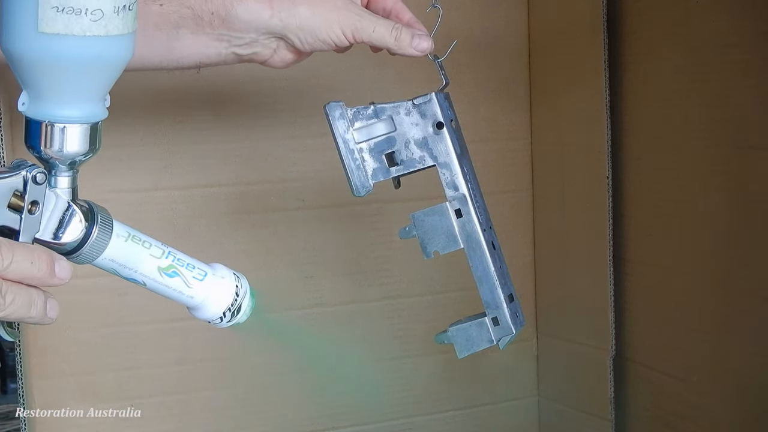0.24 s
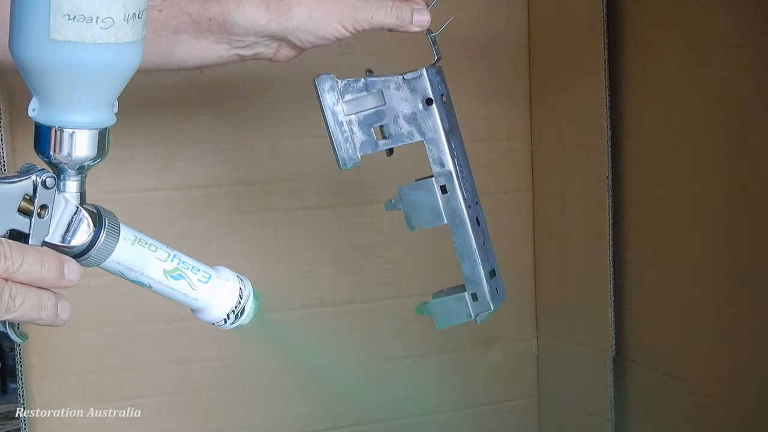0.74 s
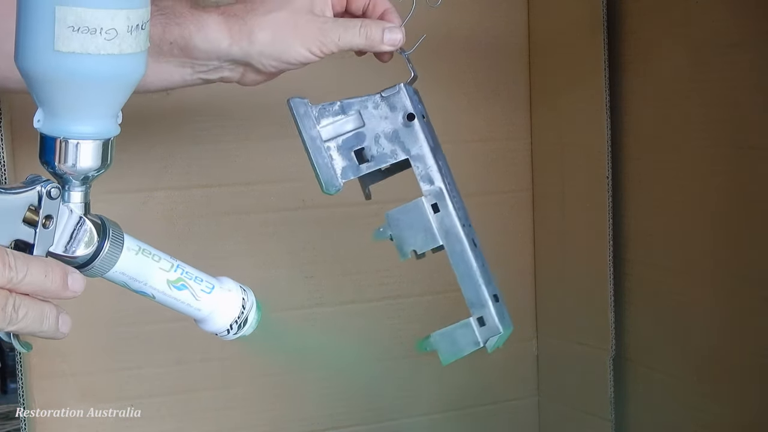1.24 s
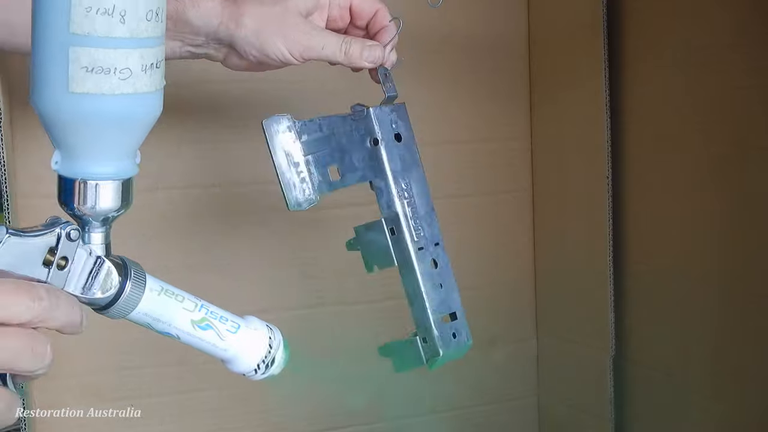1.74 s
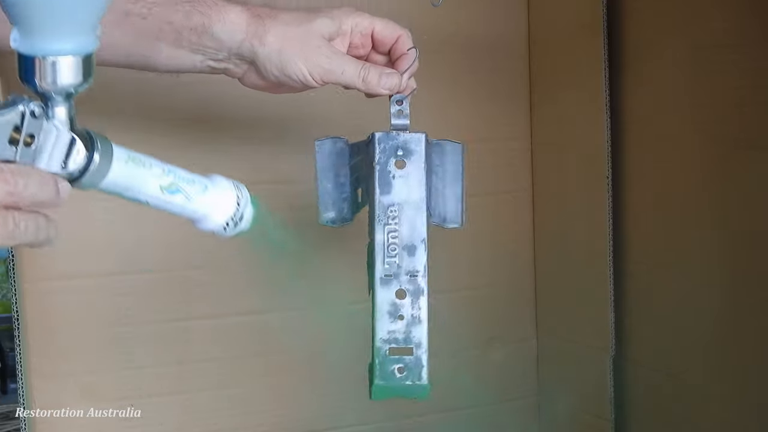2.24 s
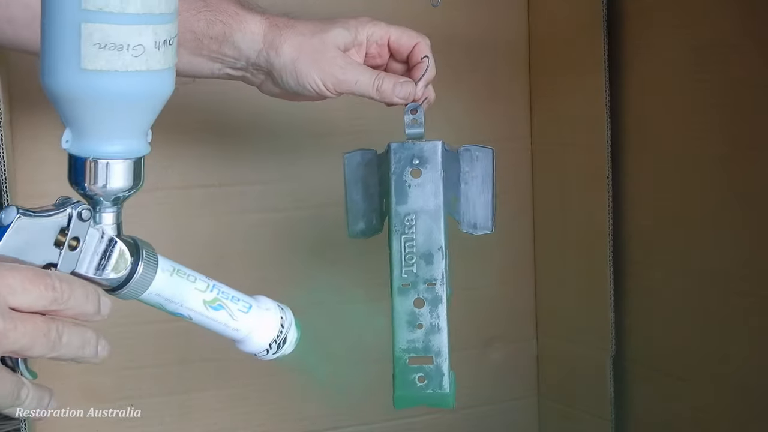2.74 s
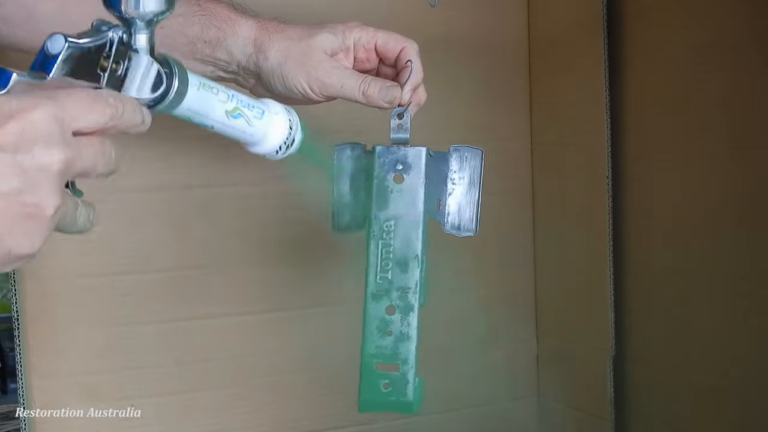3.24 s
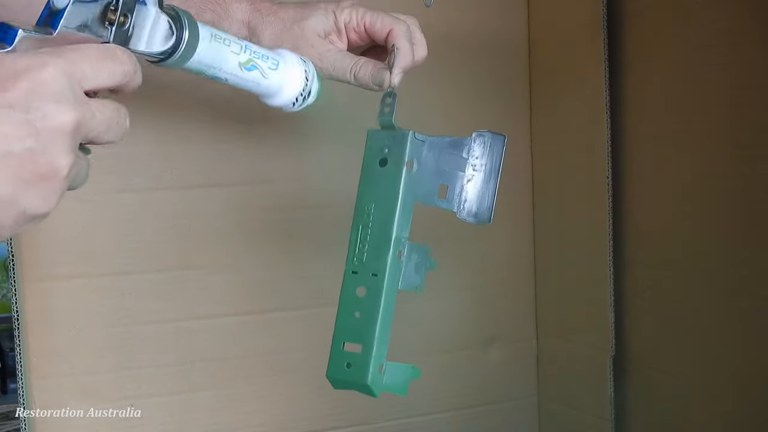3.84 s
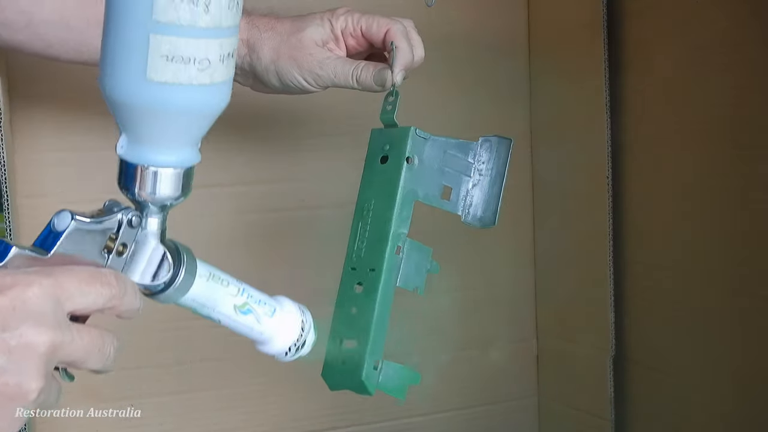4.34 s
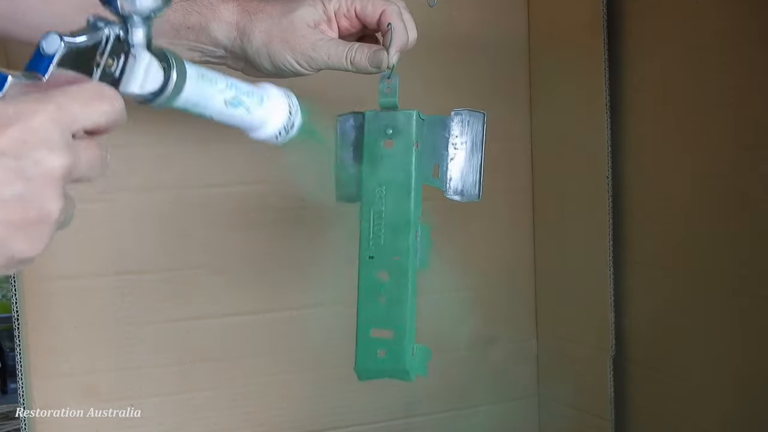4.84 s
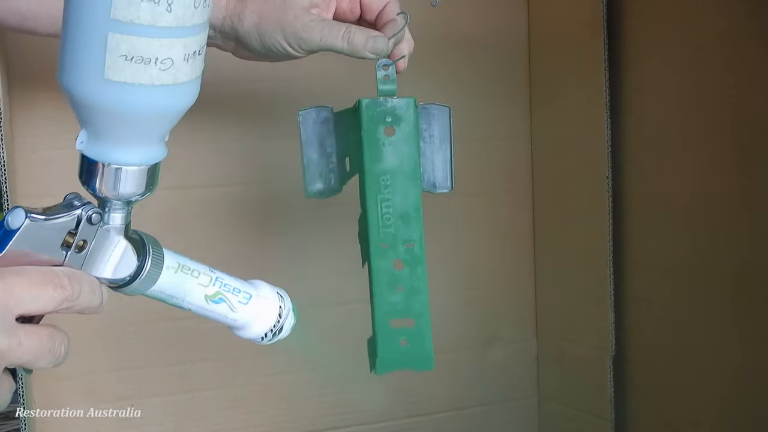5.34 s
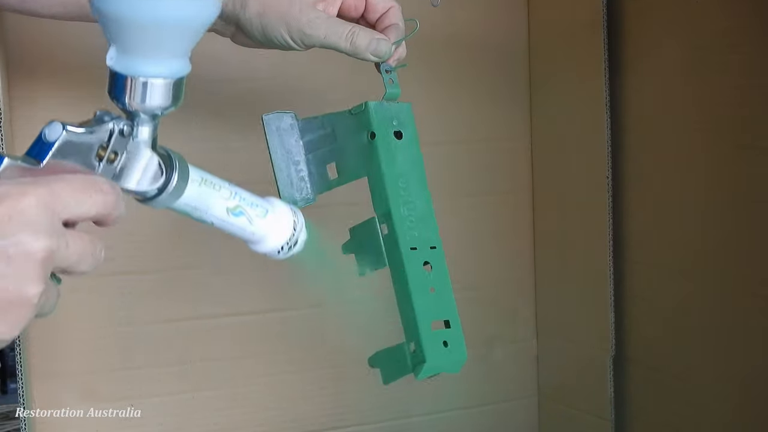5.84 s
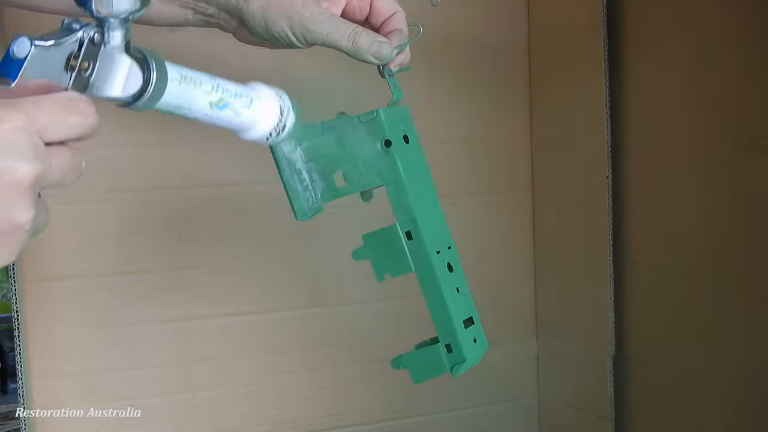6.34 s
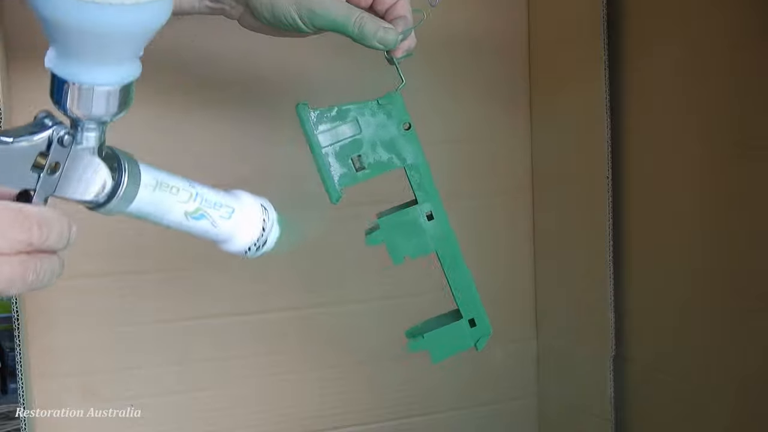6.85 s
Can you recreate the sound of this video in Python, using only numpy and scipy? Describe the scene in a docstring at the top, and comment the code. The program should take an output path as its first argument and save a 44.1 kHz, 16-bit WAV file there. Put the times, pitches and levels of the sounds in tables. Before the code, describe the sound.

A powder paint gun hisses close to the microphone for the whole seven seconds, a steady, slightly fluttering leak of air with a thin, high, breathy whistle that swells and fades. A soft metal knock comes at about 0.5 seconds. Then seven short trigger pulls each add a louder, broader rush that sputters and spits powder, at about 2.0, 2.6, 3.2, 4.0, 4.8, 6.0 and 6.5 seconds. Each lasts around a fifth of a second, the one at 4.8 a little longer. Light metal clicks come near 2.5 and 6.4 seconds, with fainter ticks near 2.8 and 3.5. Just before 4 seconds a faint band of hiss rises in pitch. After the last spurt, the steady hiss and whistle continue to the end. Nearby cardboard walls give the hiss a slightly hollow, shifting colour, and a quiet, low workshop rumble lies underneath.

```python
"""A powder-paint gun in a workshop, aimed into a cardboard booth, close to a small camera's two ports.
Air bleeds steadily through its long hollow nozzle tube with a breathy whistle; seven trigger pulls
each add a broader, sputtering rush and spit slugs of powder. The booth walls, close by, comb the hiss.
The trigger and a hanging metal part click, and the workshop rumbles in the background."""
import sys
import numpy as np
from scipy import signal
from scipy.fft import rfft, irfft, next_fast_len
from scipy.io import wavfile
from scipy.ndimage import uniform_filter1d, minimum_filter1d

SR = 44100
rng = np.random.default_rng(int(sys.argv[2]) if len(sys.argv) > 2 else 0)


def log_audio(samples):
    """Write samples as a 16-bit WAV file to the path given in sys.argv[1]."""
    # one column per channel
    frames = np.atleast_2d(samples).T
    # limit to full scale, then quantise
    limited = np.clip(frames, -1, 1)
    pcm = np.round(limited * 32767).astype(np.int16)
    wavfile.write(sys.argv[1], SR, pcm)


N = 313551
TIME = np.arange(N) / SR
FFT_SIZE = next_fast_len(N + 8000)
BIN_HZ = np.maximum(np.arange(FFT_SIZE // 2 + 1) * SR / FFT_SIZE, 1)


def undb(db):
    """Decibels to gain."""
    return 10 ** (np.asarray(db) / 20)


def over_hz(table, column=1):
    """One column of a table whose rows begin with Hz, spread over the spectral bins."""
    rows = np.array(table, float)
    return np.interp(np.log(BIN_HZ), np.log(rows[:, 0]), rows[:, column])


def over_time(table):
    """The columns of a table whose rows begin with seconds, as one curve each."""
    seconds, *columns = np.transpose(table)
    return np.array([np.interp(TIME, seconds, column) for column in columns])


def wander(rate_hz):
    """Smooth random drift with a spread near 1."""
    hold = int(SR / rate_hz)
    steps = np.repeat(rng.standard_normal(N // hold + 1), hold)
    return 1.14 * uniform_filter1d(uniform_filter1d(steps, hold), hold)[:N]


def hiss(colour, edges_hz, levels_db, flicker_db, flicker_hz, grain_db):
    """Noise, a direct and a scattered row; each zone follows its level, its halves flickering apart."""
    grains = undb(grain_db * wander(600))
    spectrum = rfft(rng.standard_normal((2, N)) * grains, FFT_SIZE) * colour
    out = 0
    for low, high, db in zip(edges_hz, edges_hz[1:], levels_db):
        zone = 0
        middle = np.sqrt(low * high)
        for bottom, top in ((low, middle), (middle, high)):
            half = irfft(spectrum * ((BIN_HZ >= bottom) & (BIN_HZ < top)), FFT_SIZE)[:, :N]
            zone = zone + half * undb(flicker_db * wander(flicker_hz))
        out = out + zone / np.sqrt(np.mean(zone ** 2)) * undb(db)
    return out


def breath(centre_hz, width_hz):
    """Narrow noise of rms 1 around a moving centre, a direct and a scattered row."""
    lowpass = signal.butter(2, width_hz / 2, fs=SR, output="sos")
    sway = signal.sosfilt(lowpass, rng.standard_normal((2, 2, N)))
    phase = 2 * np.pi * np.cumsum(centre_hz) / SR
    band = sway[0] * np.cos(phase) + sway[1] * np.sin(phase)
    return band / band.std()


# Room tone of the workshop. Each row: frequency in Hz, relative level in dB.
ROOM_COLOUR = [(8.8, -54), (15, -16), (111, -1.5), (157, -5.5), (286, -9.5), (354, -9.5), (472, -11.5),
               (927, -13), (1120, -14.5), (1420, -14.5), (1500, -4.5), (1950, -37), (3300, -120)]
# Its slow swell. Each row: time in seconds, lift of the rumble in dB.
ROOM_SWELL = [(0, 0.5), (.45, 0.5), (.7, 4), (1, 0), (1.5, -0.5), (2.5, -2), (3.5, -1.5), (4.2, -2),
              (4.7, 1.5), (5.2, -2), (5.7, -1.5), (6.2, -2.5), (7.11, -1)]


def workshop():
    """The room behind the gun: a steady deep floor, a swelling rumble and a murmur above it."""
    swell_db, = over_time(ROOM_SWELL)
    levels_db = [-67, -57.5 + swell_db, -58 + .5 * swell_db]
    colour = undb(over_hz(ROOM_COLOUR))
    return hiss(colour, [16, 60, 200, 1500], levels_db, flicker_db=.5, flicker_hz=4, grain_db=0)


# Modes of the metal. Each row: frequency in Hz, relative level in dB, seconds to fall 60 dB.
METAL_MODES = [(250, -14, .06), (380, -12, .04), (600, -12, .03), (790, -8, .035), (910, -5, .035),
               (1250, -7, .012), (1900, -2, .009), (2600, 0, .012), (3200, -3, .008), (4700, -9, .01),
               (5400, -11, .01), (6200, -19, .01)]
# Knocks. Each row: start in seconds, peak in dB, lift of the low and of the high modes in dB.
KNOCKS = [(.5405, -31.5, 8, -6), (2.4897, -24.5, -16, 0), (2.4962, -22.5, -22, -4), (2.844, -39, -16, 2),
          (3.503, -38, -16, 6), (6.371, -25, -16, 2), (6.379, -28, -20, -2)]


def metal_clicks():
    """Trigger and hanging part: a soft contact rings damped modes; a weak copy comes off the booth."""
    out, t = np.zeros((2, N)), np.arange(4000) / SR
    contact = (1 - np.exp(-t / .0002)) ** 2
    detunes = 1 + .019 * rng.standard_normal((len(KNOCKS), len(METAL_MODES)))
    for (start, peak_db, low_db, high_db), detune in zip(KNOCKS, detunes):
        ring = 0
        for (hz, db, t60), ratio in zip(METAL_MODES, detune):
            gain = undb(db + low_db * (hz < 1000) + high_db * (hz > 4000))
            ring = ring + gain * np.sin(2 * np.pi * hz * ratio * t) * undb(-60 * t / t60) * contact
        i = int(start * SR)
        out[0, i:i + len(t)] += undb(peak_db) * ring / np.abs(ring).max()
    out[1] = .6 * np.roll(out[0], int(.00074 * SR))
    return signal.sosfilt(signal.butter(6, [130, 6000], "bandpass", fs=SR, output="sos"), out)


# Echoes off the cardboard. Each row: delay in ms, relative level in dB, drift in ms at a stray of 1.
WALL_ECHOES = [(1.091, -12.5, 0.098), (1.499, -10.5, 0.2), (2.498, -10, 0.18), (3.54, -11.5, 0.11),
               (4.298, -13, 0.13), (4.701, -16, 0.094), (5.099, -10.5, 0.23), (6.3, -11, 0.18)]
# How far the gun strays from its place. Each row: time in seconds, stray as a factor on the drift.
GUN_STRAY = [(0, 0.53), (1, 0.71), (2, 1.03), (3, 1.35), (7.11, 1.26)]


def booth(gun):
    """Short echoes off the nearby walls comb the hiss into bands that drift with the gun."""
    stray, = over_time(GUN_STRAY)
    out, samples = gun.copy(), np.arange(N)
    for delay_ms, db, drift_ms in WALL_ECHOES:
        delay = (delay_ms + drift_ms * stray * wander(4)) * SR / 1000
        out += undb(db) * np.array([np.interp(samples - delay, samples, row) for row in gun])
    return out / np.sqrt(1 + sum(undb(db) ** 2 for _, db, _ in WALL_ECHOES))


# One sweep of the gun. Each row: time in seconds, centre in Hz, level in dB.
SWING_PATH = [(3.78, 3220, -68), (3.85, 3270, -55), (3.92, 3550, -53), (4.0, 3870, -51), (4.07, 3950, -56),
              (4.12, 3980, -72)]


def gun_swing():
    """A band of hiss climbs as the gun swings round in front of the microphone."""
    seconds, hz, db = np.transpose(SWING_PATH)
    gain = undb(np.interp(TIME, seconds, db, left=-200, right=-200))
    return breath(np.interp(TIME, seconds, hz), width_hz=240) * gain


# The whistle between pulls. Each row: time in seconds, pitch in Hz, level in dB.
WHISTLE_PATH = [(0, 4700, -58.5), (.3, 4810, -56.5), (.6, 4860, -57), (.8, 4700, -53), (1.001, 4700, -54.5),
                (1.15, 4660, -49.5), (1.279, 4650, -61), (1.42, 4660, -51), (1.55, 4750, -57),
                (1.65, 4760, -61), (2.0, 4762, -56.5), (2.4, 4660, -67), (2.88, 4590, -73),
                (3.0, 4584, -60), (3.149, 4700, -50.5), (3.24, 4663, -51), (3.43, 4400, -60),
                (3.55, 4410, -58.5), (3.95, 4592, -52.5), (4.35, 4840, -61.5), (4.72, 4657, -60),
                (5.22, 4265, -68), (5.32, 4260, -48.5), (5.42, 4400, -61), (5.5, 4690, -60),
                (5.78, 4800, -65), (5.94, 4710, -68), (6.35, 4850, -55), (6.75, 4720, -59),
                (7.0, 4810, -47.5), (7.11, 4600, -54.5)]


def nozzle_whistle():
    """A thin breathy band comes and goes; in full flow a broader one builds up at its own pitch."""
    idle_hz, idle_db = over_time(WHISTLE_PATH)
    thin = breath(idle_hz + 30.2 * wander(3), width_hz=92) * undb(idle_db)
    starts, lengths, *_, pull_hz, pull_db = np.transpose(PULLS)
    build_s = .09
    built = np.array([valve(start, length) * np.clip((TIME - start) / build_s, 0, 1)
                      for start, length in zip(starts, lengths)])
    latest_pull = np.maximum(np.searchsorted(starts, TIME) - 1, 0)
    broad = breath(pull_hz[latest_pull], width_hz=450) * (undb(pull_db) @ built)
    return (thin * (1 - built.sum(axis=0)) + broad) * undb(1.8 * wander(8))


# Resonances of the nozzle tube. Each row: centre in Hz, width in Hz, lift in dB.
TUBE_BANDS = [(1518, 280, 6), (2340, 99, 2.5), (3420, 49, -9), (4110, 490, 7), (4630, 53, 4), (4790, 85, 3)]
# Top end of both bleed and rush. Each row: frequency in Hz, relative level in dB.
TREBLE_COLOUR = [(5150, 2), (5500, -5.5), (6600, -5.5), (7400, -13.5), (8700, -14), (9600, -29),
                 (10300, -33), (11500, -36.5), (13500, -41.5)]


def nozzle_tube(body_colour):
    """Gain by frequency of air leaving the tube: standing waves lift or hollow narrow bands."""
    air_db = np.where(BIN_HZ < TREBLE_COLOUR[0][0], over_hz(body_colour), over_hz(TREBLE_COLOUR))
    tube_db = sum(db / (1 + (2 * (BIN_HZ - hz) / width) ** 2) for hz, width, db in TUBE_BANDS)
    return undb(air_db + tube_db)


# The bleed as the gun swings. Each row: time in seconds, then seven zone levels in dB, low to high.
BLEED_LEVELS = [(0, -52, -43, -45.5, -52, -59, -58, -66), (.5, -50.5, -43.5, -47.5, -49, -58, -54, -65),
                (1, -56.5, -44.5, -43.5, -47, -59, -54.5, -66),
                (1.5, -54.5, -44, -47, -49.5, -55, -54.5, -65.5),
                (1.95, -49, -45, -42.5, -46.5, -57.5, -58, -66.5),
                (2.4, -53, -43, -43, -50.5, -56, -59, -64),
                (2.85, -53, -43, -43.5, -47.5, -57, -58.5, -65.5),
                (3.03, -52, -44, -42, -45, -58.5, -58.5, -65.5),
                (3.55, -49.5, -43, -41, -45.5, -54.5, -55.5, -63.5),
                (3.95, -46.5, -42, -38, -46, -54.5, -55, -63),
                (4.35, -55, -44.5, -43.5, -45, -54.5, -57, -67.5),
                (4.72, -52, -41.5, -41.5, -44, -54.5, -54, -66.5),
                (5.3, -54, -43, -41.5, -49.5, -55.5, -56, -64.5),
                (5.5, -55, -42, -41.5, -46, -56, -56.5, -64.5), (5.72, -52, -45, -39, -45, -55, -54, -66),
                (5.93, -56.5, -44, -46.5, -49.5, -57.5, -58.5, -66.5),
                (6.33, -50.5, -40.5, -48.5, -48, -52.5, -53.5, -62),
                (6.72, -50.5, -43.5, -43.5, -42, -49, -47, -61),
                (6.85, -51, -42, -37.5, -44.5, -53, -56.5, -64),
                (7.11, -56.5, -41, -43, -45.5, -49.5, -58.5, -63)]
# Edges of those zones in Hz.
BLEED_EDGES_HZ = [900, 1900, 2500, 3000, 3500, 4450, 5150, 14000]
# Body of the bleed. Each row: frequency in Hz, relative level in dB.
BLEED_COLOUR = [(900, -26), (1400, -26.5), (1500, -21.5), (1800, -8), (2000, -3), (3200, -3.5),
                (3380, -7.5), (3800, -24.5), (4300, -24), (4650, -8), (4880, -4), (5050, -13),
                (5150, -19.5)]


def air_bleed():
    """Air leaks through the tube all the time, fluttering with eddies and dulling after each pull."""
    sag_db = [2.5, -2, -3, -4.5, -4.5, -3, -3.5]  # by zone
    levels_db = over_time(BLEED_LEVELS) + np.outer(sag_db, pressure_sag())
    levels_db += .47 * wander(45)  # eddies
    levels_db[-1] += 1.5 * wander(8)  # the treble flares and sinks
    colour = nozzle_tube(BLEED_COLOUR)
    return hiss(colour, BLEED_EDGES_HZ, levels_db, flicker_db=1.26, flicker_hz=29.46, grain_db=1)


# Slugs of powder. Each row: start in seconds, peak in dB, centre in Hz.
SLUGS = [(2.0648, -22, 2770), (2.1, -21.5, 2300), (2.122, -18.5, 2210), (2.16, -25, 2400),
         (2.1797, -25.5, 2180), (2.2228, -25, 2690), (2.574, -25, 2700), (2.5792, -24, 2020),
         (2.5866, -28.5, 2400), (2.6043, -18.5, 2390), (2.671, -20, 2370), (2.692, -19.5, 2440),
         (2.7191, -22.5, 2370), (2.75, -21, 2580), (2.944, -35, 2900), (2.99, -25, 2900),
         (3.165, -27.5, 2350), (3.195, -32, 2400), (3.343, -30, 2700), (4.0076, -25, 2920),
         (4.036, -19, 2480), (4.045, -29, 2460), (4.093, -24.5, 1940), (4.108, -25, 2670),
         (4.144, -26, 2850), (4.2186, -29, 1830), (4.8287, -25, 2300), (4.855, -18, 2120),
         (4.898, -24.5, 1940), (4.931, -22.5, 2240), (5.003, -26, 2740), (5.1, -30, 2830),
         (5.128, -30, 2860), (5.9996, -22.5, 2240), (6.062, -24.5, 2340), (6.0896, -26, 2414),
         (6.1355, -22, 2340), (6.146, -23, 2350), (6.2003, -20, 2420), (6.452, -23, 2120),
         (6.47, -27, 2030), (6.5408, -22, 2640), (6.588, -23, 2090), (6.599, -20.5, 2890),
         (6.6098, -23, 2400), (6.624, -17, 2140), (6.637, -30, 2940)]


def powder_spits():
    """Each slug leaves the nozzle as a short puff of noise, quick to rise and slower to die."""
    out, t = np.zeros((2, N)), np.arange(3000) / SR
    rise_s = .0018
    envelope = t / rise_s * np.exp(1 - t / rise_s)
    for start, peak_db, hz in SLUGS:
        bandpass = signal.butter(4, [hz / 1.17, hz * 1.142], "bandpass", fs=SR, output="sos")
        puff = signal.sosfilt(bandpass, rng.standard_normal((2, len(t)))) * envelope
        i = int(start * SR)
        out[:, i:i + len(t)] += undb(peak_db) * puff / np.abs(puff).max(axis=1, keepdims=True)
    return out


def valve(start, length, open_s=.021, half_close_s=.011, seat_s=.052):
    """How far the trigger valve is open, 0-1: it drops halfway quickly, then seats slowly."""
    end = start + length
    half_shut = end + half_close_s
    return np.interp(TIME, [start - open_s, start, end, half_shut, half_shut + seat_s], [0, 1, 1, .5, 0])


def pressure_sag(onset_s=.022, recover_s=.11):
    """Lack of pressure, deepest as each pull ends and fading afterwards."""
    since_end = TIME - np.array([[start + length] for start, length, *_ in PULLS])
    width_s = np.where(since_end < 0, onset_s, recover_s)
    return np.exp(-(since_end / width_s) ** 2).sum(axis=0)


def jet_aim(rush, boom_hz=536):
    """Each pull points elsewhere: two bands are lifted or hollowed, and the booth booms on one note."""
    out = rush.copy()
    for start, length, *_, hz_a, db_a, hz_b, db_b, boom_db, _, _ in PULLS:
        span = slice(int((start - .05) * SR), int((start + length + .1) * SR))
        opening = valve(start, length)[span]
        for hz, db, width_hz in ((hz_a, db_a, 380), (hz_b, db_b, 380), (boom_hz, boom_db, 45)):
            band = signal.lfilter(*signal.iirpeak(hz, hz / width_hz, fs=SR), rush[:, span])
            out[:, span] += (undb(db) - 1) * band * opening
    return out


# Trigger pulls. Each row: start and length in seconds, roar and its swell over the pull in dB,
# valley and ridge in dB against the bright hiss, two aim bands each as Hz and dB, boom lift in dB,
# whistle pitch in Hz, whistle level in dB.
PULLS = [(2.047, 0.219, -48.5, 2.5, -3, -2.5, 2360, 4, 1600, 3.5, 3, 4730, -52),
         (2.57, 0.205, -48, 1, -1, -1, 2350, 1.5, 3180, -5.5, 3, 4690, -52.5),
         (3.169, 0.236, -51, 6.5, -6, -3, 2450, -11, 3700, -12, 11, 4300, -52),
         (4.011, .22, -49, -1, -2.5, -8, 1820, 5.5, 3300, -10, 8, 4690, -52.5),
         (4.82, 0.34, -50.5, -2.5, -3, -6, 2450, -13, 3500, -6, 9.7, 4300, -48.5),
         (5.996, 0.21, -48.5, 0.5, -3, -5, 2400, 3.5, 3050, -5, 4.3, 4240, -55),
         (6.452, 0.1966, -53, 9, -6, -2.5, 2100, 4, 3070, 3, 4, 4700, -55.5)]
# Flow, one list a pull. Each row: time in seconds, then main hiss, bright hiss and treble in dB.
PULL_FLOW = [
    [(2.046, -52, -46.5, -60), (2.064, -39, -44.5, -55), (2.074, -37, -49, -61), (2.13, -30.5, -42, -57),
     (2.138, -37.5, -46.5, -60), (2.254, -38, -46, -58), (2.266, -45, -43.5, -60)],
    [(2.57, -38, -42.5, -56), (2.578, -23.5, -44, -54), (2.588, -32.5, -47.5, -56.5),
     (2.646, -37, -46, -55), (2.662, -35, -47.5, -55.5), (2.764, -35, -48.5, -57), (2.77, -40, -49.5, -60)],
    [(3.168, -39.5, -47, -56), (3.208, -38, -48, -63), (3.228, -39, -50, -60), (3.286, -47.5, -46, -57),
     (3.332, -33, -41.5, -55), (3.372, -46, -44.5, -56), (3.408, -32.5, -46.5, -59.5)],
    [(4.011, -40, -39.5, -48.5), (4.029, -42, -51, -60), (4.039, -32, -43, -59), (4.071, -52, -51, -58),
     (4.095, -37.5, -48, -58.5), (4.229, -46.5, -48.5, -59.5), (4.231, -41, -43.5, -61)],
    [(4.82, -33.5, -42.5, -54), (4.852, -35, -50, -57), (4.86, -30.5, -42.5, -60), (4.87, -38, -47, -58),
     (4.908, -34.5, -47.5, -54), (5.136, -38, -47, -57), (5.151, -49, -47, -60.5)],
    [(5.997, -35.5, -45.5, -57), (6.04, -36.5, -45.5, -59), (6.095, -35, -46, -59),
     (6.111, -45, -44.5, -59), (6.151, -32, -45, -57), (6.167, -39, -46, -55), (6.207, -37.5, -42.5, -57),
     (6.217, -44, -38, -55)],
    [(6.453, -32, -46.5, -55), (6.501, -38.5, -48, -55.5), (6.515, -39, -47, -54), (6.541, -37, -43, -59),
     (6.561, -36.5, -49, -57), (6.629, -26.5, -37.5, -53.5), (6.643, -33, -38, -54)],
]
# Edges in Hz of the six zones: roar, main hiss, valley, ridge, treble, fizz.
RUSH_EDGES_HZ = [250, 1400, 3500, 4450, 5150, 10300, 14000]
# Body of the rush. Each row: frequency in Hz, relative level in dB.
RUSH_COLOUR = [(250, -21.5), (480, -22.5), (716, -25), (950, -23.5), (1250, -18.5), (1400, -19),
               (1680, -8.5), (2330, -3), (3100, -7), (3680, -12), (4200, -17), (4700, -15.5), (5150, -18.5)]


def trigger_rush(shut_db=-25, fizz_db=-24.5):
    """Full flow while the trigger is held; powder clumps make it stutter, most in the main hiss."""
    levels_db = np.full((6, N), -120.)
    for (start, length, roar_db, swell_db, valley_db, ridge_db, *_), flow in zip(PULLS, PULL_FLOW):
        opening = valve(start, length)
        flowing = opening > 0
        t = TIME[flowing] - start
        main, bright, treble = over_time(flow)[:, flowing]
        throttle_db = shut_db * (1 - opening[flowing])
        seal_db = 20 * np.log10(np.minimum(opening[flowing] / .2, 1))
        roar = roar_db + swell_db * (t / length - .5)
        roar -= .5 * throttle_db * (t > 0)  # the low roar dies more slowly
        zones_db = np.array([roar, main, bright + valley_db, bright + ridge_db, treble, treble + fizz_db])
        levels_db[:, flowing] = zones_db + throttle_db + seal_db
    levels_db += .51 * np.outer([.7, 1, .6, .6, .5, .5], wander(90))  # clumps
    levels_db += .8 * np.array([wander(20) for _ in levels_db])  # each zone wanders alone
    levels_db[-2:] += 1.5 * wander(16)  # the treble flares and sinks
    colour = nozzle_tube(RUSH_COLOUR)
    return hiss(colour, RUSH_EDGES_HZ, levels_db, flicker_db=1.5, flicker_hz=34.88, grain_db=3)


# The camera's microphone pair. Each row: frequency in Hz, likeness of the ports from 0 to 1,
# left minus right in dB, left phase lead in radians.
MIC_PORTS = [(60, 0.86, -0.5, 0.053), (900, 0.94, -1, -0.37), (1900, 0.96, -0.3, 0.032),
             (3250, 0.95, 0.5, 0.22), (4500, 0.8, 6.5, 0.2), (4900, 1, 0, -0.57), (5330, 0.7, -3.5, -0.96),
             (6000, 0.8, 1, 0.46), (8500, 0.9, -0.5, 0.94), (12000, .35, 0, .4)]


def microphone_ports(sound):
    """Two closely spaced ports get the direct row nearly alike, the scattered row in opposite sign."""
    edge = (FFT_SIZE - N) // 2
    direct, scattered = rfft(np.pad(sound, ((0, 0), (edge, edge)), "reflect"), FFT_SIZE)
    likeness, balance_db, lead_rad = (over_hz(MIC_PORTS, column) for column in (1, 2, 3))
    skew = undb(balance_db / 2) * np.exp(.5j * lead_rad)
    scattered *= np.sqrt((1 - likeness) / (1 + likeness))
    left, right = (direct + scattered) * skew, (direct - scattered) / skew
    return irfft([left, right], FFT_SIZE)[:, edge:edge + N]


def scene():
    """The gun at the booth with the workshop behind it, heard from the camera's position."""
    gun = air_bleed() + jet_aim(trigger_rush()) + powder_spits()
    return microphone_ports(booth(gun) + nozzle_whistle() + gun_swing() + metal_clicks() + workshop())


def record(dry):
    """The camera's limiter turns the loudest peaks down; the top is cut."""
    ceiling_db, window, top_hz = -17, int(.004 * SR), 13500
    allowed = np.minimum(undb(ceiling_db) / (np.abs(dry).max(axis=0) + 1e-9), 1)
    gain = uniform_filter1d(minimum_filter1d(allowed, size=window), size=window)
    return signal.sosfilt(signal.ellip(8, .2, 70, top_hz, fs=SR, output="sos"), dry * gain)


dry = scene()
out = record(dry)
log_audio(out)
```